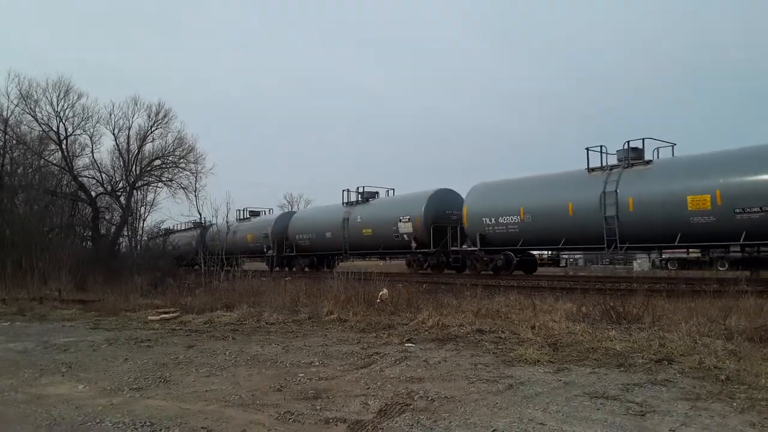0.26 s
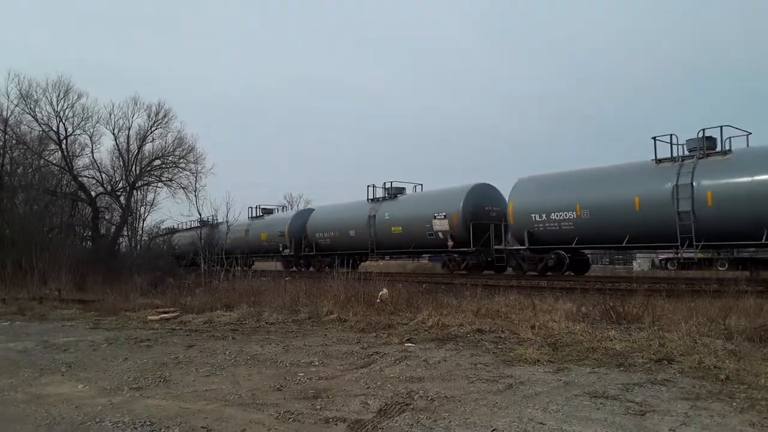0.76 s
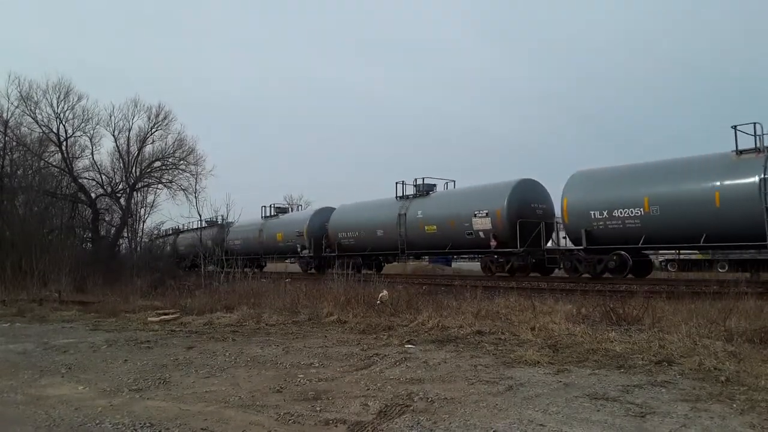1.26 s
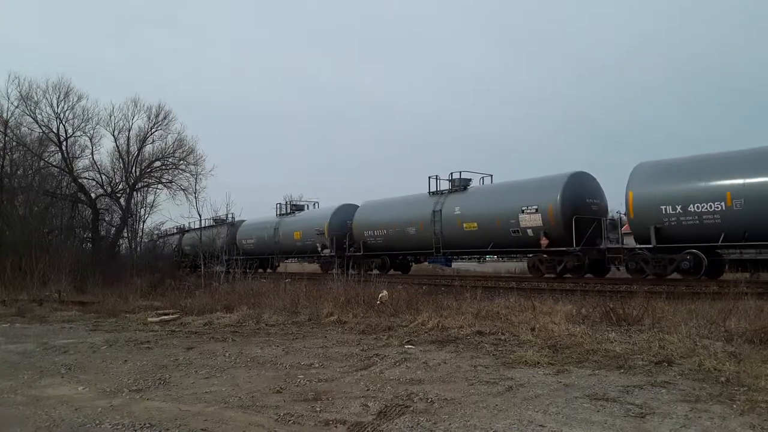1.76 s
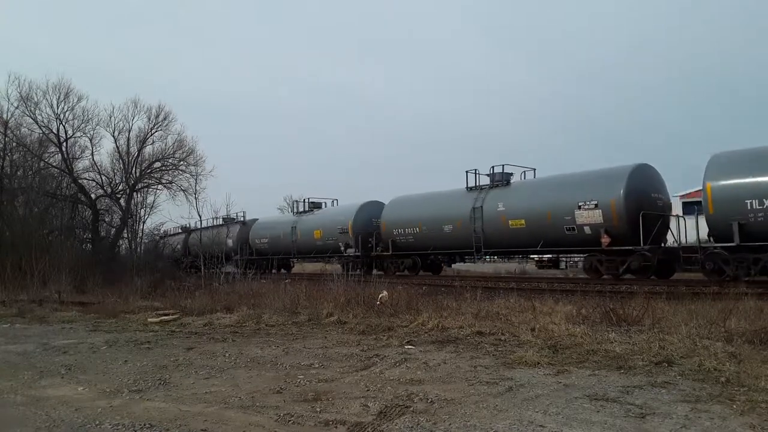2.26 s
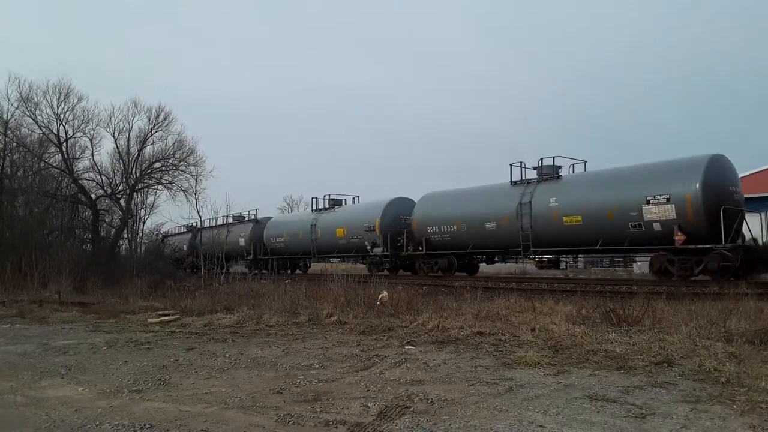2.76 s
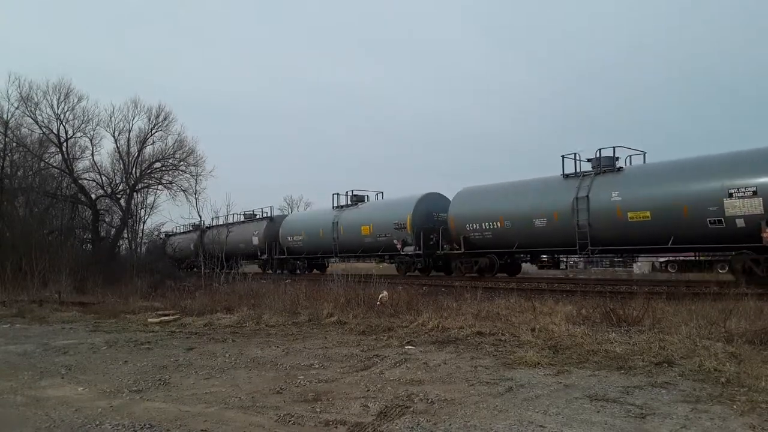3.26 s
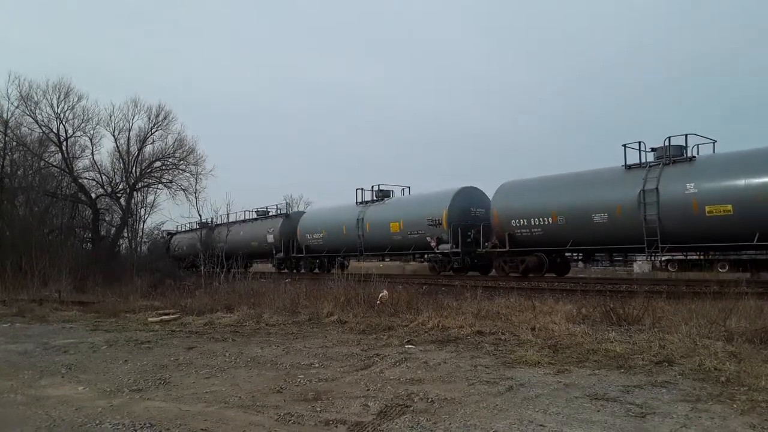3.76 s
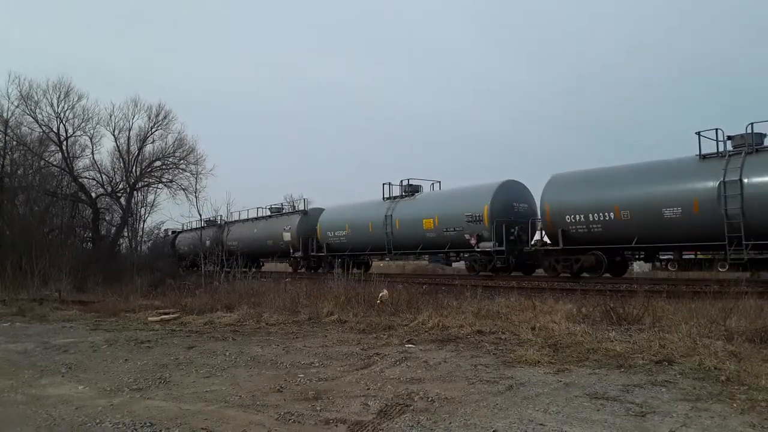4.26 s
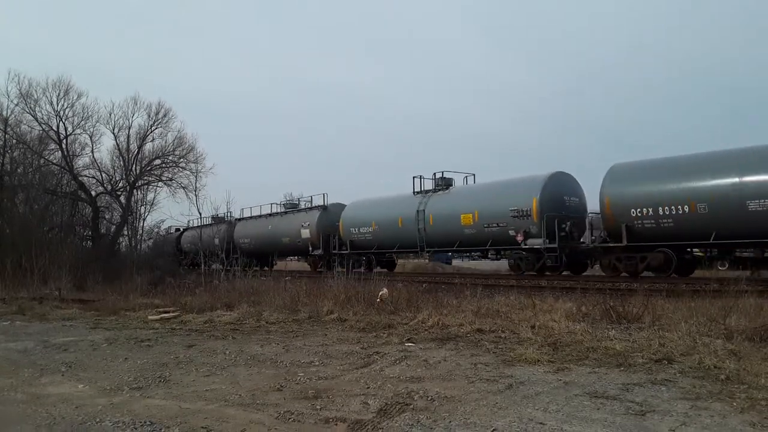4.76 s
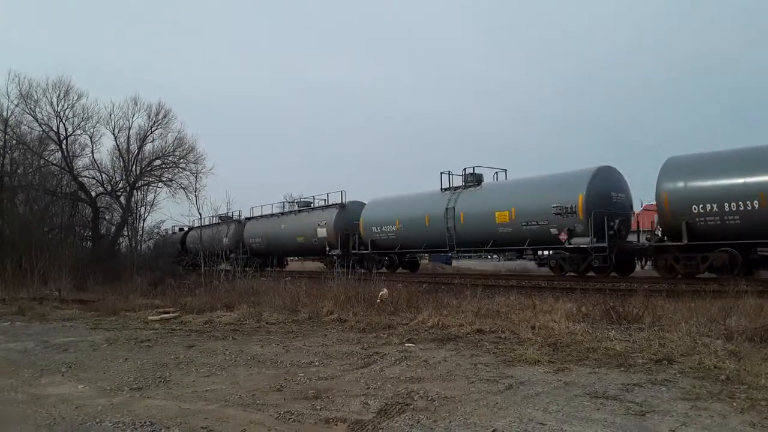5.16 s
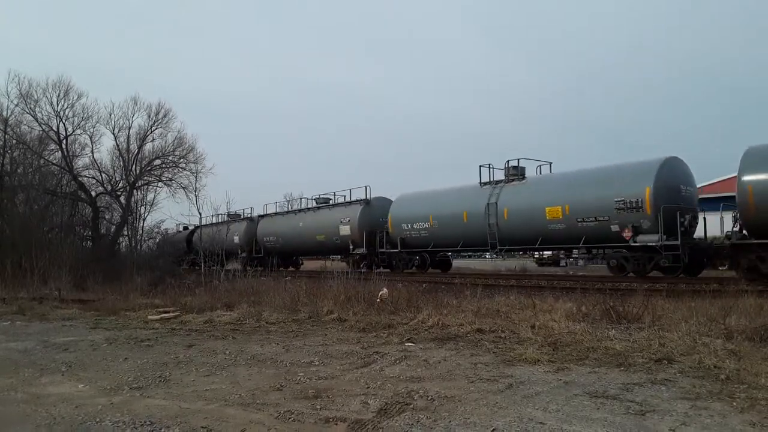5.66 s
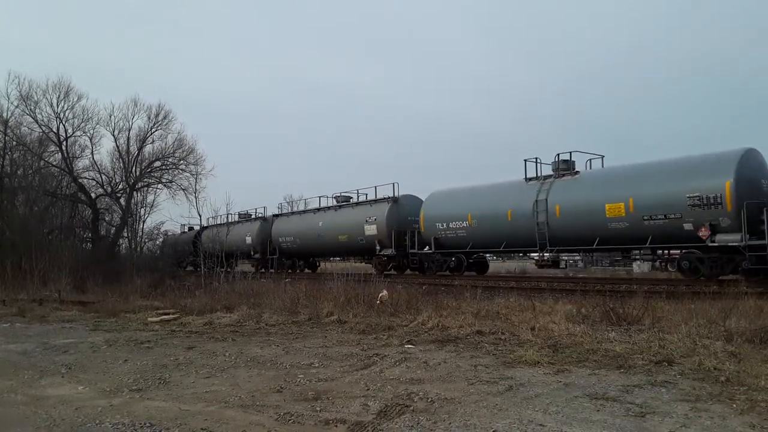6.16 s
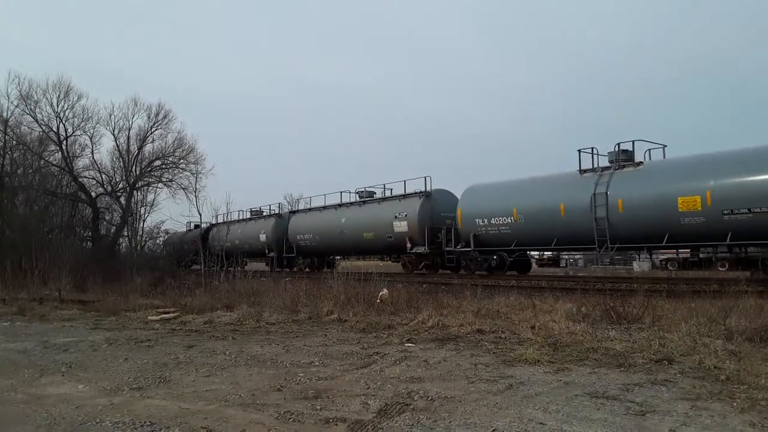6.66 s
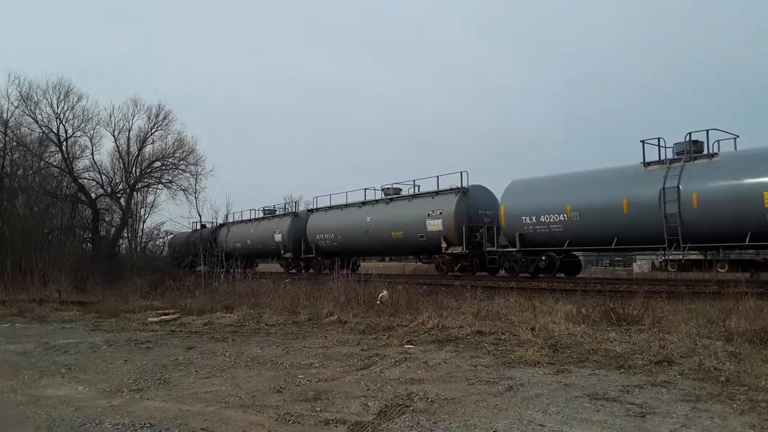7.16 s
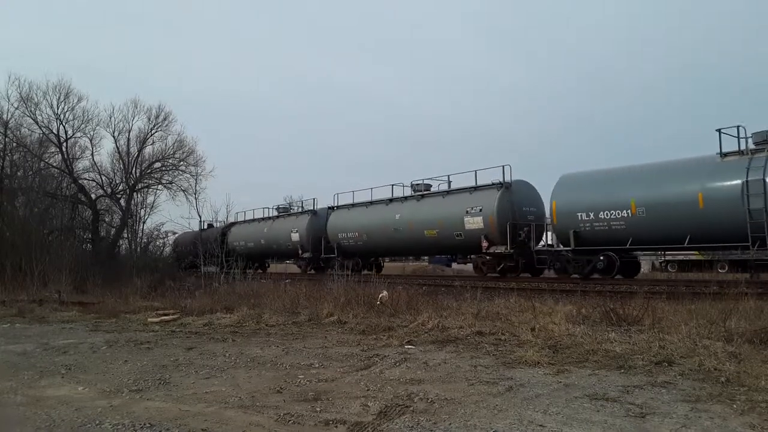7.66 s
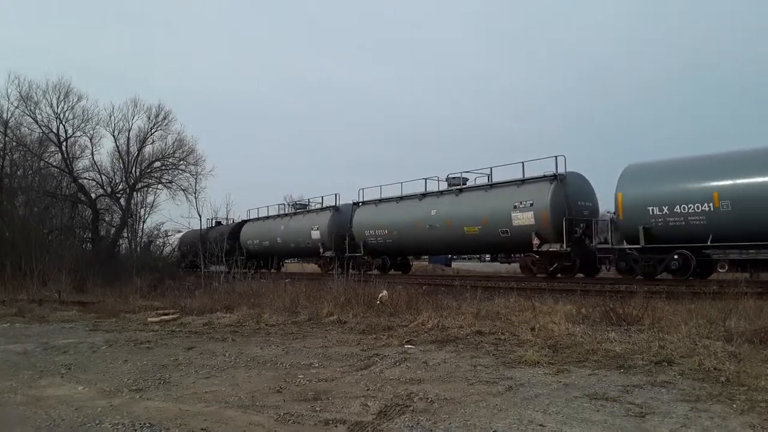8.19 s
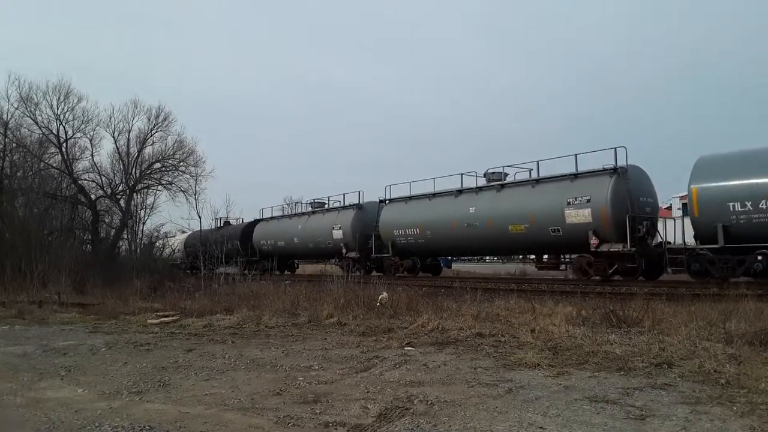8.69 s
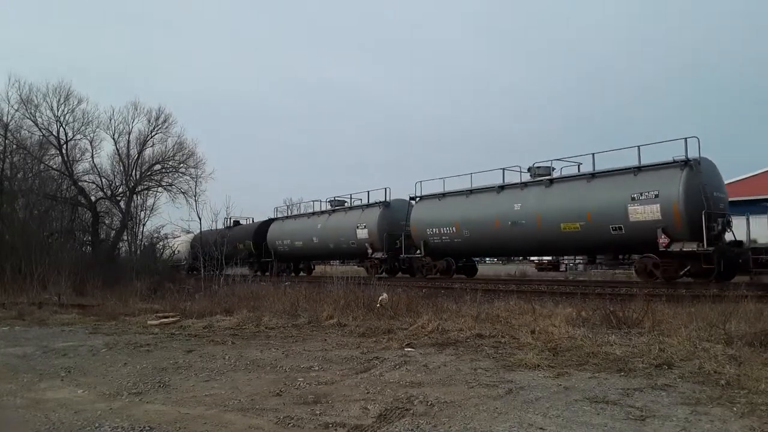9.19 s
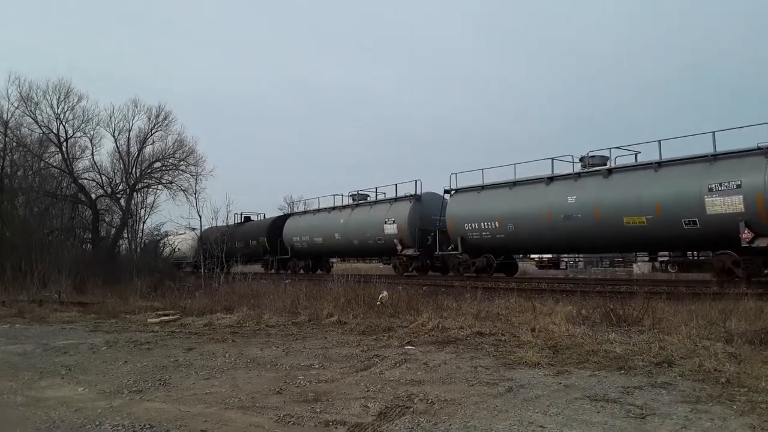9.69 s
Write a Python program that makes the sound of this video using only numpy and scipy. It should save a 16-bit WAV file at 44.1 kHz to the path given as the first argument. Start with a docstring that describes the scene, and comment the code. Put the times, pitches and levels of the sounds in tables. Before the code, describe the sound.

A freight train of tank cars rolls past close by outdoors, with a low rumble under hissing steel friction. A brief scrape comes from the right, then one piercing wheel shriek stands out. After a short lull, stuttering squeals at several pitches build and overlap, growing denser toward the end. The tanks occasionally give a faint hollow boom. In stereo, the rumble sits to the right and the squeals mostly ahead.

```python
"""Freight train of tank cars passing.

Wheels rumble on rough rail. Flanges grind and ring the modes of the steel wheels; modes lock
into squeals that flare and stutter. Now and then a tank booms. The deep rumble and a scraping
flange come from off to the right, the nearest wheels from almost straight ahead."""
import sys
import numpy as np
from scipy import signal
from scipy.fft import rfft, irfft, next_fast_len
from scipy.io import wavfile
from scipy.ndimage import uniform_filter1d

SR = 44100
rng = np.random.default_rng(int(sys.argv[2]) if len(sys.argv) > 2 else 0)


def int16_out(signal):
    """Quantize to a 16-bit WAV file."""
    q = np.round(np.clip(np.atleast_2d(signal).T, -1, 1) * 32767)
    wavfile.write(sys.argv[1], SR, q.astype(np.int16))


N = 437913
SIDE_LAG_S = .00046  # left behind right


def amp(db):
    return 10 ** (np.asarray(db) / 20)


def unit_rms(x):
    return x / np.sqrt(np.mean(np.abs(x) ** 2) + 1e-20)


def spectrum(points, hz):
    """Gain through (frequency [Hz], level [dB]) points, log frequency axis."""
    point_hz, db = np.transpose(points)
    return amp(np.interp(np.log(hz + 1), np.log(point_hz + 1), db))


def curves(rows):
    """Per-sample curve for each column after the time."""
    time_s, *columns = np.transpose(rows)
    return [np.interp(np.arange(N) / SR, time_s, column) for column in columns]


def filtered(x, response):
    """Apply a complex response(hz)."""
    size = next_fast_len(N + 8192)
    hz = np.fft.rfftfreq(size, 1 / SR)
    return irfft(rfft(x, size) * response(hz), size)[..., :N]


def direction(hz, lag_s, balance_db):
    """Stereo response of a source to one side; lag and balance are left minus right."""
    split = np.array([[.5], [-.5]])
    return amp(balance_db * split) * np.exp(-2j * np.pi * hz * lag_s * split)


def patchy_noise(depth_db, bins, frames, count=1):
    """Noises whose level varies in shared patches of bins (43 Hz) by frames (12 ms)."""
    cells = signal.stft(rng.standard_normal((count, N)), nperseg=1024)[2]
    patches = rng.standard_normal(cells.shape[1:])
    for _ in range(2):
        patches = uniform_filter1d(patches, bins, axis=0)
        patches = uniform_filter1d(patches, frames, axis=1)
    cells *= amp(depth_db * unit_rms(patches))
    return unit_rms(signal.istft(cells, nperseg=1024)[1][:, :N])


# Rumble strength: (time [s], deep level [dB], light level [dB])
RUMBLE_LEVELS = [(0, -37, -46), (1.96, -34.5, -50.5), (3.21, -39, -51), (3.4, -36.5, -47.5),
                 (6.28, -35, -48), (6.86, -38.5, -51.5), (7.08, -35, -48), (9.37, -35.5, -47.5),
                 (9.74, -40, -40), (9.93, -39.5, -59)]
# Rumble spectra: (frequency [Hz], relative density [dB])
DEEP_SPECTRUM = [(20, -30), (40, -19), (165, -2.5), (205, -1), (265, 2.5), (350, 0), (536, -10), (888, -18),
                 (967, -13), (1110, -12), (1400, -15), (1820, -5.5), (3080, -120)]
LIGHT_SPECTRUM = [(60, -34), (250, -34), (600, 6), (1000, -3.5), (1400, -5.5), (2500, -51)]


def rolling_rumble():
    """Wheels on rough rail, hollow tanks: deep from the right side, lighter from almost ahead."""
    deep_db, light_db = curves(RUMBLE_LEVELS)
    scattered = amp(-13.5) * rng.standard_normal((2, N))
    deep = patchy_noise(2.03, bins=3, frames=8) + scattered
    deep = filtered(deep, lambda hz: spectrum(DEEP_SPECTRUM, hz) * direction(hz, SIDE_LAG_S, -3.5))
    light = patchy_noise(3.5, bins=3, frames=8)
    light = filtered(light, lambda hz: spectrum(LIGHT_SPECTRUM, hz) * direction(hz, .000093, -1.2))
    return amp(deep_db) * unit_rms(deep) + amp(light_db) * unit_rms(light)


# Wheel modes: (frequency [Hz])
MODE_HZ = [974, 1575, 1770, 1890, 2150, 2220, 2489, 2680, 2760, 3160, 3351, 3510, 3871, 4011, 4455, 4560,
           5040, 5290, 5434, 5700, 6200, 6364, 6550, 6880, 7030, 7350, 7480, 8000, 8295, 8830, 9270, 9486,
           9750, 10300, 10653, 10830, 11270, 11440, 11756, 12218, 12740, 13200, 14050, 15000]
# Their resonances, same order: (width [Hz], relative peak [dB])
MODE_PEAKS = [(15.3, 1.5), (24.2, 16), (39.3, 22), (72, 14.5), (10, 14), (24, 15), (10, 5), (72, 19),
              (29.8, 17.5), (39.2, 15.5), (14, 10.5), (56, 23), (24, 17), (14, 14), (50.6, 19), (60, 14.5),
              (25, -2), (40, 19.5), (46.7, 20.5), (30, 13), (65, 20.5), (25.1, 23.5), (30, 15.5),
              (120, 8.5), (70, 12), (40, 15.5), (60, 9), (30, 36.5), (12, 33), (59.4, 25), (70, 17),
              (10, 28), (100, 23), (60, 13.5), (29.8, 19.5), (30, 8), (40, 14), (50, 21), (34, 23),
              (45, 21.5), (79, -4), (130, 19.5), (120, 20), (190, 15.5)]
# Friction rasp, dip near 8 kHz: (frequency [Hz], relative density [dB])
RASP_SPECTRUM = [(400, -101), (900, -0.5), (1300, -8), (1900, -1), (3000, -5), (4500, -2), (5900, -11.5),
                 (7300, -7.5), (7750, -28), (8200, -17), (9000, -12), (10500, 0), (13000, 3), (15100, -3.5),
                 (15400, -17), (16000, -28)]


def wheel_response(hz, tuning, floor_db):
    """Sharp steel modes on a broad rasp, split at the dip into low and high bands."""
    mode_power = sum(amp(2 * peak_db) / (1 + (2 * (hz - mode_hz * tuning) / width_hz) ** 2)
                     for mode_hz, (width_hz, peak_db) in zip(MODE_HZ, MODE_PEAKS))
    small_mode_power = spectrum([(5000, -50), (10000, 18)], hz)  # fills the treble gaps
    gain = spectrum(RASP_SPECTRUM, hz) * np.sqrt(amp(2 * floor_db) + small_mode_power + mode_power)
    return gain * np.array([[hz < 7750], [hz >= 7750]])


def rubbed_wheels(lag_s, balance_db, tuning, floor_db, scatter_db):
    """Modes come and go as the contact changes; some sound, mostly treble, arrives scattered."""
    noise = patchy_noise(6, bins=1, frames=14, count=3)
    scattered = amp(scatter_db) * filtered(noise[1:], lambda hz: hz / 10000)
    bands = filtered(noise[0] + scattered,
                     lambda hz: wheel_response(hz, tuning, floor_db) * direction(hz, lag_s, balance_db))
    return np.array([unit_rms(band) for band in bands])


# Direction of the nearest wheels: (time [s], left lag [ms])
NEAR_PATH = [(0, -.1), (1.85, 0), (2.0, .04), (2.7, .04), (2.9, -.1), (4.4, -.09), (9.93, .1)]


def drift(x, balance_db):
    """The nearest wheels drift across the front."""
    hz, time_s, cells = signal.stft(x, SR, nperseg=1024)
    lag_s = np.interp(time_s, *np.transpose(NEAR_PATH)) / 1000
    steering = np.stack([direction(hz, lag, balance_db) for lag in lag_s], axis=-1)
    return signal.istft(cells * steering, SR, nperseg=1024)[1][..., :N]


# Flange friction: (time [s], high band level [dB], low band re high [dB])
GRIND_LEVELS = [(0, -37.5, 4), (.62, -39.5, 3.5), (.75, -21, -2.5), (.92, -23, -2.5), (1.08, -36, 1.5),
                (1.878, -35.5, 1), (1.91, -19, -1), (2.1, -21, -1), (2.68, -25, -2), (2.93, -36.5, 3.5),
                (3.34, -31, 2), (3.68, -35, 4.5), (3.88, -22.5, 0.5), (4.2, -23.5, 0), (4.35, -30, 3),
                (5.06, -25, 2.5), (6.1, -28, 4), (6.2, -21.5, 0.5), (6.6, -26, 1.5), (7.7, -23.5, 0.5),
                (8.5, -22, -2), (8.7, -19, -2.5), (9.07, -24, 4), (9.26, -27, 3.5), (9.46, -22, 0),
                (9.79, -23, 1), (9.93, -31.5, -5.5)]
# Friction from the nearest wheels: (time [s], power share [0-1])
NEAR_SHARE = [(0, .75), (.6, .75), (.72, .1), (1.05, .2), (1.3, .75), (1.9, .9), (3.65, .85), (3.8, .15),
              (4.2, .2), (4.4, .8), (6.0, .85), (6.2, .5), (6.5, .8), (9.93, .9)]


def flange_grind():
    """Friction rings the near wheels; a flange to the right, tuned lower, scrapes in coarse bursts."""
    high_db, low_relative_db = curves(GRIND_LEVELS)
    near_share, = curves(NEAR_SHARE)
    side = rubbed_wheels(SIDE_LAG_S, balance_db=-4, tuning=.993, floor_db=1.5, scatter_db=-10)
    near = rubbed_wheels(0, balance_db=0, tuning=1, floor_db=-7.5, scatter_db=4.5)
    near = drift(near, balance_db=-.71)
    low, high = np.sqrt(1 - near_share) * side + np.sqrt(near_share) * near
    return amp(high_db) * (high + amp(low_relative_db) * low)


def waver(n, rate_hz):
    """Random complex wander of amplitude and phase."""
    real, imag = rng.standard_normal((2, 2500))
    return np.interp(np.arange(n) * rate_hz / SR, np.arange(2500), real + 1j * imag)


def flare_envelope(flares, start, stop):
    """Pointed flares summed as power; swell and fade times span 20 dB."""
    coarse_s = np.arange(start, stop + 64, 64) / SR
    peak_s, swell_s, fade_s, peak_db = np.transpose(flares)[..., None]
    from_peak = np.where(coarse_s < peak_s, (peak_s - coarse_s) / swell_s, (coarse_s - peak_s) / fade_s)
    gains = amp(peak_db - 20 * from_peak ** .84)
    return np.interp(np.arange(start, stop) / SR, coarse_s, np.linalg.norm(gains, axis=0))


# Squealing modes: (start pitch [Hz], end pitch [Hz], start left lag [ms], end left lag [ms],
# left minus right [dB], waver rate [Hz], waver depth [ratio])
SQUEAL_MODES = [ (975, 973, .14, .14, -1, 12, .6), (1562, 1558, .43, .46, -1.4, 14, .3),
                (1588, 1587, .43, .46, -1.4, 16, .3), (1785, 1770, -.09, 0, -2, 25, .2),
                (1865, 1865, -.03, -.03, .6, 60, 1.2), (1854, 1849, -.03, -.03, -1.1, 22, .4),
                (2483, 2483, -.03, -.03, -3.2, 10, .2), (2560, 2595, .456, .456, -3.6, 60, 1.2),
                (2609, 2604, .037, .037, -2.7, 12, .2), (2648, 2640, .032, .032, -2.8, 30, .6),
                (2760, 2740, .08, .08, -2.1, 16, .5), (3563, 3548, -.12, .04, -2.4, 40, .35),
                (4012, 4010, -.01, -.01, -2.9, 12, .5), (4468, 4464, -.06, -.05, -1.5, 40, .45),
                (4551, 4551, -.012, -.012, 1.4, 20, .15), (4590, 4578, -.011, -.011, 1.3, 25, .25),
                (4432, 4440, .45, .45, -2.5, 30, .6), (4510, 4530, -.01, -.01, -1, 40, .8),
                (1925, 1950, -.03, -.03, -1, 30, .6), (5445, 5430, -.085, -.085, .9, 40, .9),
                (6228, 6226, .06, .02, -.4, 20, .6), (6364, 6364, -.05, -.01, -1.2, 20, .6),
                (9750, 9730, -.03, .03, -1.4, 80, 1.5), (10665, 10650, .01, .03, -2.4, 35, .9),
                (11440, 11420, .01, .03, -4, 30, .8), (12250, 12225, -.02, .03, -2.4, 35, .7),
                (12760, 12750, -.02, .03, -2.4, 60, 1.3), (13345, 13325, -.02, .05, -2.3, 30, .6),
                (3352, 3343, -.08, .04, -2, 14, .5), (4410, 4395, -.05, -.05, -1.5, 30, .6), ]
# Flares, one list per mode: (peak time [s], swell [s], fade [s], level [dB])
SQUEAL_FLARES = [
    [(2.521, 0.55, 0.96, -44)],
    [(1.14, 0.19, 0.49, -31), (4.48, 0.08, 0.34, -26.5), (7.52, 0.17, 0.83, -34)],
    [(0.5, 0.49, 2.3, -34.5), (1.52, 0.099, 0.32, -28.5), (3.74, 0.11, 0.16, -28.5), (3.74, 1.5, 1.3, -35),
     (6.8, 0.4, 0.42, -30), (7.92, 0.36, 1.28, -33)],
    [(3.153, 0.056, 0.062, -29), (3.342, 0.018, 0.033, -27), (3.542, 0.1, 0.086, -26),
     (3.806, 0.24, 0.079, -25.5), (3.996, 0.055, 0.067, -19.5), (4.246, 0.12, .08, -23.5),
     (4.31, 0.039, 0.11, -20.5), (4.41, .06, 0.026, -21.5), (4.5, 1.36, 1.7, -40),
     (4.58, 0.033, 0.15, -23.5), (4.929, 0.17, 0.032, -24), (5.128, 0.076, 0.033, -24),
     (5.333, 0.088, 0.045, -27), (5.473, 0.22, 0.017, -28), (5.532, 0.031, 0.036, -26),
     (5.802, 0.11, 0.059, -28.5), (6.056, 0.04, 0.076, -27), (6.321, 0.36, 0.057, -25),
     (6.4, 0.82, 1.18, -32.5), (6.425, 0.041, 0.03, -16), (6.615, 0.026, 0.023, -16.5),
     (6.68, 0.042, 0.021, -16.5), (7.263, 0.066, 0.2, -18.5), (7.398, 0.06, 0.052, -21.5),
     (7.543, 0.13, 0.062, -22.5), (7.712, 0.1, 0.038, -21), (7.862, 0.24, 0.024, -22.5),
     (7.937, 0.046, 0.095, -18), (8.166, 0.062, 0.034, -15), (8.2, 1.3, 1.67, -35),
     (8.316, 0.12, 0.034, -19.5), (8.416, 0.044, 0.036, -12.5), (8.745, 0.052, 0.041, -20.5),
     (9.633, 0.11, 0.014, -27)],
    [(1.941, 0.051, 0.21, -23)],
    [(7.179, 0.059, 0.07, -26.5), (7.578, 0.038, 0.05, -21), (7.6, 1.5, 1.79, -31),
     (8.107, 0.18, 0.057, -25), (8.765, 0.29, 0.082, -24), (8.945, 0.11, 0.048, -23)],
    [(0.05, 0.5, 1, -37.5)],
    [(0.822, 0.15, 0.186, -27.5)],
    [(6.62, 0.11, 2.6, -34), (9.0, 0.3, 0.34, -18.5), (9.13, 0.41, 0.2, -16.5), (9.3, .3, 0.68, -24)],
    [(.85, 0.17, .12, -32), (2.24, 0.054, 0.29, -28), (2.484, 0.23, 0.076, -24.5), (3.82, 0.052, 0.13, -32),
     (5.3, 1, 0.42, -30.5), (6.919, 0.077, 0.034, -23), (7.159, 0.033, 0.034, -27),
     (7.488, 0.032, 0.056, -25.5), (7.693, 0.066, 0.037, -23), (8.241, 0.04, 0.039, -23),
     (8.346, 0.15, 0.057, -23), (9.48, 1, 0.19, -29.5)],
    [(9.84, 0.12, 0.35, -32)],
    [(2.185, 0.053, 0.45, -30), (3.248, 0.12, 0.092, -26), (3.6, 0.53, 1.06, -29.5),
     (3.861, 0.035, 0.28, -21.5), (4.056, 0.073, 0.024, -19), (4.116, 0.039, 0.05, -29),
     (4.495, 0.5, 0.072, -21), (4.605, 0.089, 0.11, -24), (5.009, 1.3, 0.15, -25), (6.0, 1.5, 1.2, -34.5),
     (5.318, 0.077, 0.11, -24), (5.542, 0.12, 0.13, -25), (5.817, 0.023, 0.017, -24),
     (5.877, 0.034, 0.16, -23), (6.166, 0.25, 0.21, -29.5), (6.341, 0.068, 0.31, -25),
     (6.585, 0.18, 0.15, -29), (6.75, 0.091, 0.23, -23.5), (6.964, 0.057, 0.072, -25),
     (7.283, 0.031, 0.02, -19.5), (7.378, 0.048, 0.072, -29), (7.573, 0.038, 0.087, -25),
     (7.782, 0.18, 0.099, -19.5), (7.902, 0.23, 0.039, -24), (8, 0.31, 1.1, -26.5),
     (8.276, 0.065, 0.12, -21.5), (8.85, 0.6, 0.42, -21.5), (9.034, 0.21, 0.15, -17),
     (9.229, 0.13, 0.036, -22), (9.329, 0.06, 0.076, -25.5), (9.434, 0.13, 0.47, -23.5),
     (9.7, 0.33, 0.15, -43)],
    [(2.44, 0.14, 0.28, -30), (7.8, 0.81, 0.22, -29.5), (9.87, 0.11, .15, -38)],
    [(0.16, 0.11, 1.5, -38), (4.9, 0.14, 0.48, -40), (5.153, 0.19, 0.1, -33), (6.62, 0.28, 0.48, -31),
     (6.79, 0.05, 0.24, -29), (7.1, 0.51, 0.75, -29.5), (7.065, 0.043, .05, -19),
     (7.139, 0.042, 0.052, -21), (7.219, 0.042, 0.057, -19), (7.493, 0.033, 0.044, -23.5),
     (7.727, 0.053, 0.05, -28), (7.837, 0.08, 0.056, -23.5), (8.461, 0.032, 0.058, -25),
     (9.199, 0.17, 0.16, -31), (9.379, 0.079, 0.22, -27)],
    [(1.98, 0.063, 0.05, -3.5), (1.93, 0.06, 0.34, -20.5), (2.07, 0.06, 0.15, -12), (2.31, 0.16, 0.42, -25)],
    [(2.0, 0.095, 0.087, -14.5), (2.16, .035, 0.033, -13.5), (2.24, 0.25, 0.48, -22.5)],
    [(0.88, 0.15, 0.16, -25), (.96, 0.087, 0.052, -27)],
    [(3.919, 0.096, 0.15, -26)],
    [(4.05, 0.09, .1, -27), (4.2, 0.084, 0.068, -28.5)],
    [(2.9, 0.24, 1, -27), (5.18, .15, 0.55, -26), (6.76, 0.14, 0.056, -27), (9.16, 0.19, 0.64, -22),
     (9.7, .2, 0.11, -20)],
    [(6.2, 0.12, 1.07, -20.5), (7.94, 0.24, 0.063, -31), ],
    [(9.4, 0.9, 0.19, -26)],
    [(8.74, 1.8, 0.67, -33.5)],
    [(7.86, 3, 0.15, -31), (9.58, 0.77, 0.18, -23)],
    [(2.02, 0.17, 2.1, -31), (2.32, 0.089, 0.062, -24), (7.84, 4.2, 1.6, -26)],
    [(7.0, 1.94, 2.7, -32), (8.96, 0.12, 0.82, -24.5), (9.78, 0.42, 0.1, -18.5)],
    [(3.94, 0.16, 0.3, -27), (9.8, 0.16, 0.092, -31)],
    [(6.98, 0.8, 0.76, -32), (7.94, 0.37, 1.9, -31), (8.7, 0.2, 0.13, -15), (8.88, 0.16, 0.051, -23),
     (9.48, 0.13, 0.14, -23)],
    [(5.5, 1.7, 1.4, -46), (9.4, .8, 0.58, -34)],
    [(7.15, .5, 0.89, -28)],
]


def wheel_squeals():
    """Stick-slip locks to one mode: a wavering tone whose pitch and direction shift as the wheel passes."""
    out = np.zeros((2, N))
    for mode, flares in zip(SQUEAL_MODES, SQUEAL_FLARES):
        start_hz, end_hz, start_lag_ms, end_lag_ms, balance_db, waver_hz, depth = mode
        peak_s, swell_s, fade_s, _ = np.transpose(flares)
        start = max(round(min(peak_s - swell_s) * SR), 0)
        stop = min(round(max(peak_s + fade_s) * SR), N)
        n = stop - start
        t = np.arange(n) / SR
        wander = waver(n, waver_hz)
        rasp = .6 * waver(n, rate_hz=130)
        stereo_flutter = .18 * np.outer([1, -1], waver(n, waver_hz))
        modulation = unit_rms(1 + depth * (wander + rasp) + stereo_flutter)
        cycles = (start_hz + (end_hz - start_hz) * t / t[-1] / 2) * t
        lag_s = np.linspace(start_lag_ms, end_lag_ms, n) / 1000
        tone = np.exp(2j * np.pi * cycles) * direction(start_hz, lag_s, balance_db)
        declick = np.minimum(1, np.minimum(t, t[::-1]) / .0038)
        envelope = flare_envelope(flares, start, stop) * declick
        out[:, start:stop] += np.sqrt(2) * envelope * np.real(modulation * tone)
    return out


# Tank shell booms: (peak time [s], swell [s], fade [s], level [dB], pitch [Hz])
TANK_BOOMS = [(.62, .15, 0.22, -37, 172), (1.3, 0.25, 0.28, -46, 163), (1.959, 0.073, 0.086, -31.5, 285),
              (4.869, 0.11, .12, -43, 320), (5.8, 0.097, 0.14, -34.5, 298.7),
              (6.049, 0.068, 0.085, -33, 341), (7.14, 0.22, 0.59, -37, 166.4)]


def tank_booms():
    """Tank shells to the right ring briefly in low, wavering notes."""
    t = np.arange(N) / SR
    out = np.zeros((2, N))
    for *flare, hz in TANK_BOOMS:
        tone = np.exp(2j * np.pi * hz * t) * direction(hz, SIDE_LAG_S, balance_db=-3)
        modulation = unit_rms(1 + waver(N, rate_hz=30))
        out += np.sqrt(2) * flare_envelope([flare], 0, N) * np.real(modulation * tone)
    return out


def scene():
    return rolling_rumble() + flange_grind() + wheel_squeals() + tank_booms()


def record(dry):
    """Soft-clip the loudest peaks, then band-limit."""
    ceiling, cutoff_hz = .97, 15750
    rounded = dry / (1 + np.abs(dry / ceiling) ** 6) ** (1 / 6)
    return filtered(rounded, lambda hz: hz < cutoff_hz)


dry = scene()
out = record(dry)
int16_out(out)
```